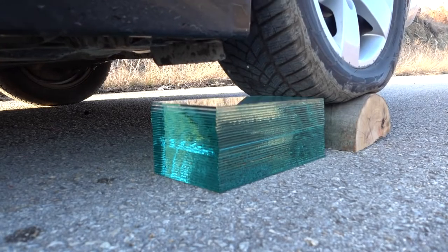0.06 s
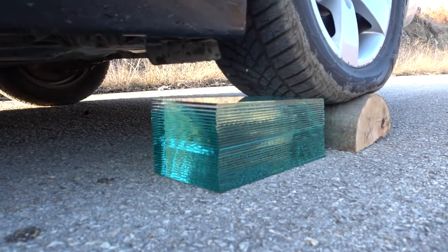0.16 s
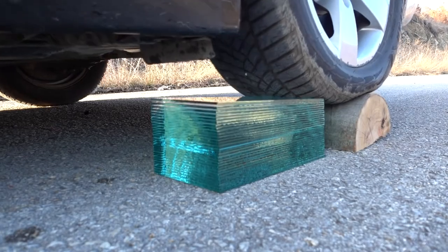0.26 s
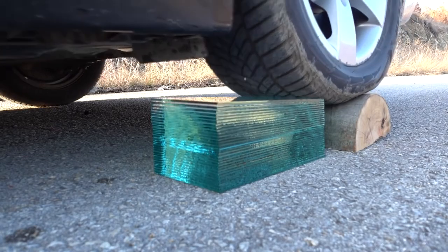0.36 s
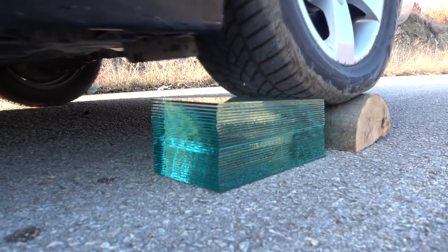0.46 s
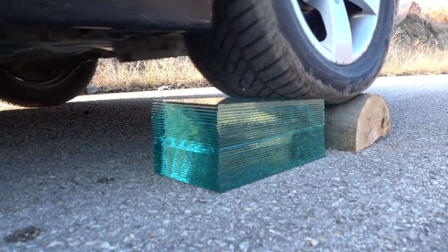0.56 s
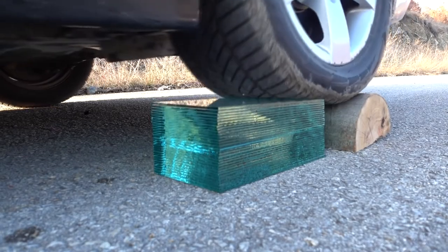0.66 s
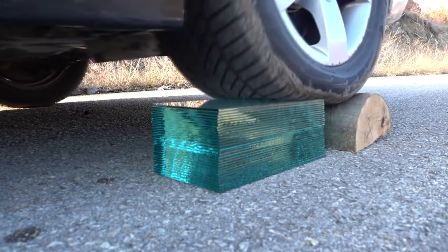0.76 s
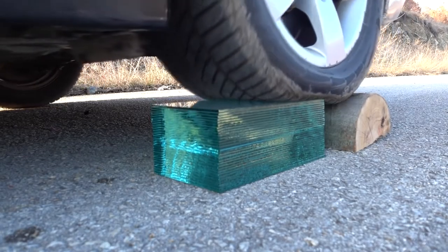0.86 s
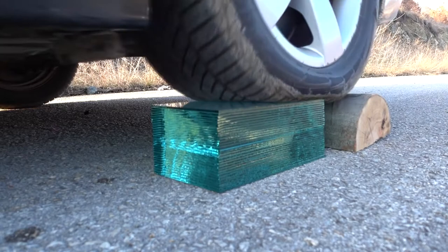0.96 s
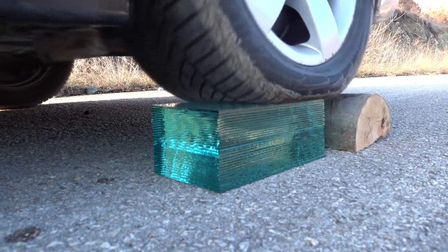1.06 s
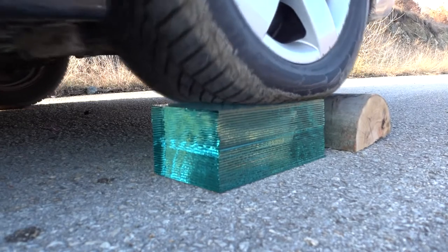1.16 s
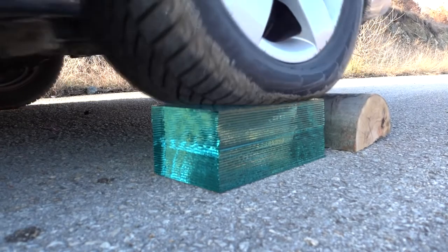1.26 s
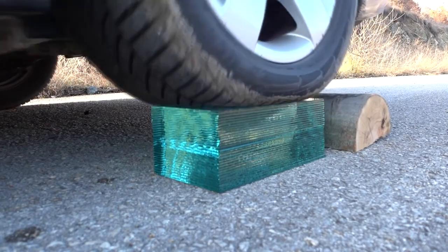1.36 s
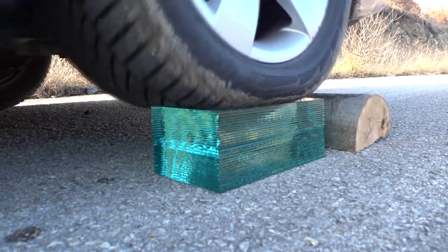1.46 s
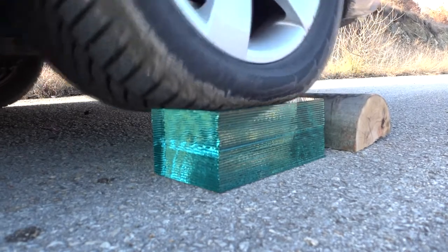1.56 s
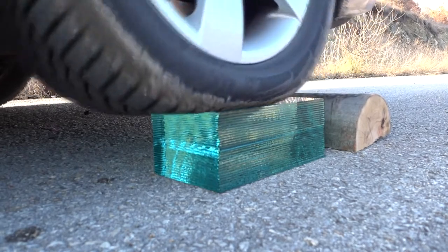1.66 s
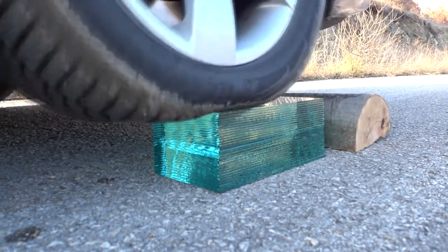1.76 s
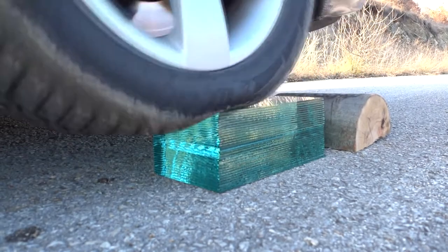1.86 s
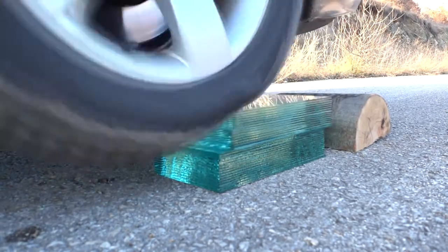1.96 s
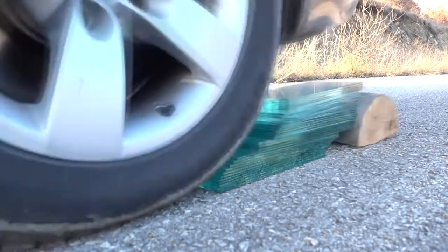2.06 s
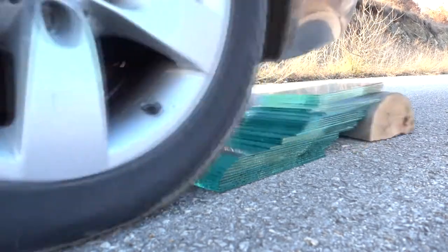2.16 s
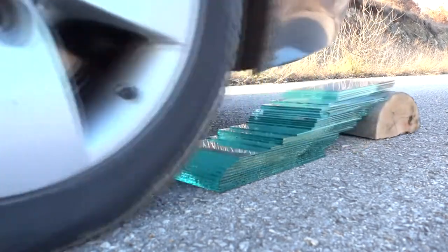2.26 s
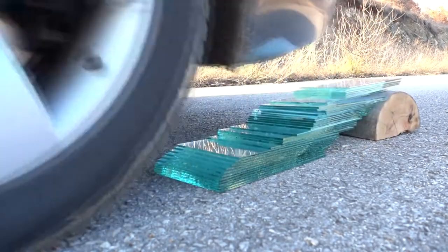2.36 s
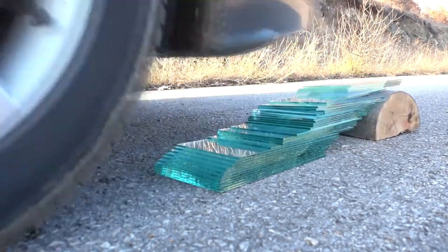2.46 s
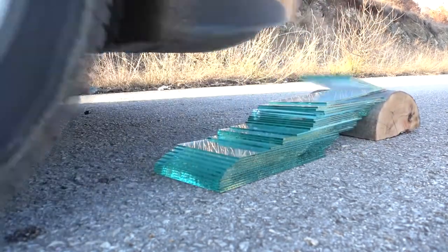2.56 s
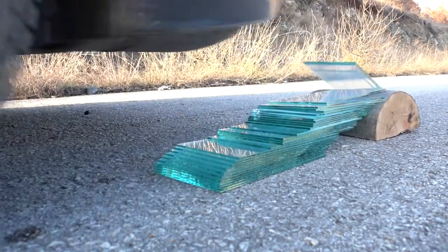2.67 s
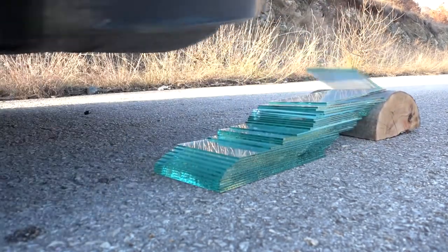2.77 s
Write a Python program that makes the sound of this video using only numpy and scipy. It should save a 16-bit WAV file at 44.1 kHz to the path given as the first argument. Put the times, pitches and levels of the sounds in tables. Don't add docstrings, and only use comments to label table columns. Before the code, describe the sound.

Close stereo pickup on a quiet open road: glass edges snap and crunch under a tyre's weight, then the wheel drops with a low thump and the panes slide, scrape, knock together and go still.

```python
import sys
import numpy as np
from scipy import signal
from scipy.io import wavfile

SR = 44100
rng = np.random.default_rng(int(sys.argv[2]) if len(sys.argv) > 2 else 0)


def linear_from_db(decibels):
    return 10 ** (np.asarray(decibels, float) / 20)


def wav_out(sig):
    wavfile.write(sys.argv[1], SR, np.round(np.clip(np.atleast_2d(sig).T, -1, 1) * 32767).astype(np.int16))


N = 125685

# pitch in Hz, level in dB per Hz.
AIR_SPECTRUM = [(25, -11), (216, 3.5), (1100, -13), (2660, -21.5), (10600, -20.5), (12000, -25)]
AIR_DB = -52.5

# time in seconds, level in dB.
THUD_LEVELS = [
    [(0, 3.5), (.018, -40), (.05, -38), (.14, -43), (.22, -71)],
    [(1.7, -55), (1.8, -50), (1.97, -51), (2.05, -30.5), (2.08, -17.5), (2.14, -21.5), (2.25, -33),
     (2.45, -35), (2.7, -43), (2.85, -43)],
]
# pitch in Hz, level in dB per Hz.
THUD_SPECTRUM = [(25, -19), (65, -0.5), (130, -8.5), (220, -6), (333, -12), (600, -31)]
TYRE_AIR_HZ, BODYWORK_HZ, TYRE_DB = 230, 132.5, 5.5

# time in seconds, brightness in dB per octave,
# level of the stack's dull body in dB, level of loose grit in dB.
LOAD = [(0, 1.5, -84, -58.5), (.45, 3, -27.5, -53), (.72, 0.5, -23.5, -31), (1.2, 0, -20, -51.5),
        (1.45, -0.5, -24.5, -45), (1.75, 3, -17.5, -44), (2.0, -0.5, -15, -41), (2.85, -1, -31, -75)]
# pitch in Hz, level in dB per Hz.
CRUMB_SPECTRUM = [(350, -14), (867, -4.5), (2610, 5.5), (4080, 5.5), (10400, -1.5), (12000, -14.5)]
GRIT_PER_S = 210

# start in seconds, peak in dB, pitch in Hz, time to ring down 60 dB in seconds.
KNOCKS = [(0.004, -30, 97, 0.062), (0.011, -24, 239, 0.1), (0.478, -28.5, 230, 0.021),
          (0.711, -29, 633, 0.055), (0.75, -26.5, 560, 0.043), (0.826, -31, 583, 0.022),
          (1.39, -25.5, 1496, 0.09), (1.7245, -20, 670, 0.046), (1.794, -16, 644, 0.035),
          (1.83, -23, 1085, 0.05), (1.982, -15, 449, 0.073), (2.059, -9, 236.3, 0.14),
          (2.097, -6, 226.4, 0.13), (2.187, -12, 224, 0.028), (2.264, -13, 795, 0.04),
          (2.342, -10.5, 763, 0.066), (2.417, -22.5, 546, 0.13), (2.514, -9, 732, 0.031),
          (2.783, -25, 630, 0.05), (2.797, -45, 875, .05)]
PLATE_RATIOS = [1, 1.68, 0.62, 1.29]

# start in seconds, peak
# in dB, crumbs after the snap in dB over that peak, pitch in Hz.
GLASS_CRACKS = [(0.0288, -55, 6, 4130), (0.1271, -42, -4, 4060), (0.186, -41, 4, 8900),
                (0.203, -27.5, 8.5, 3730), (0.2324, -16, -4, 4000), (0.2442, -24.5, 6.5, 4000),
                (0.2613, -28, 7, 4130), (0.2902, -17.5, 5.5, 4220), (0.3398, -25.5, 9, 4500),
                (0.3453, -27, 5.5, 4140), (0.3575, -40, -3, 3070), (0.413, -42.5, 10, 4270),
                (0.4559, -25, 6.5, 4400), (0.4652, -28, 2.5, 4100), (0.4998, -46, 2, 3450),
                (0.5095, -46, -3, 3590), (0.5238, -30, 13.5, 3680), (0.5366, -14.5, -2, 3580),
                (0.5798, -20.5, 8.5, 7700), (0.5963, -21.5, 5, 5940), (0.6395, -32, 11, 7800),
                (0.6656, -16, 0, 4180), (0.6996, -29.5, 13, 3030), (0.7108, -30.5, 9.5, 2650),
                (0.7269, -23, 6, 2620), (0.7489, -24, 13, 2740), (0.7926, -37.5, 16, 2270),
                (0.8248, -18.5, 4.5, 3950), (0.836, -16, 2.5, 3000), (0.8394, -27.5, -3, 2860),
               (0.8815, -16, -3.5, 2620), (0.9068, -15.5, -2, 3050), (0.9364, -15, 1, 3700),
               (0.959, -16, -5, 3400), (0.9684, -19.5, -13.5, 3100), (0.975, -31.5, 8.5, 2870),
               (1.008, -34, 7.5, 2000), (1.0603, -23.5, 5.5, 2380), (1.068, -33, 5, 2540),
               (1.0856, -34, 2, 2970), (1.1188, -15.5, -2, 3020), (1.133, -16.5, -10.5, 3130),
               (1.19, -39.5, 8, 3530), (1.2292, -35, 6, 3130), (1.2529, -20.5, 3.5, 3010),
               (1.2616, -24.5, -19, 3900), (1.283, -28, -12, 3020), (1.325, -35, 6, 3280),
               (1.3362, -29, -2, 3940), (1.3526, -20, -11.5, 3600), (1.3745, -26, -4, 2970),
               (1.3922, -14, -4.5, 2690), (1.416, -26.5, 0, 3080),
                (1.4222, -33, -7, 3000), (1.4264, -21.5, 4.5, 2830), (1.44, -27, -3, 2980),
               (1.4522, -22.5, -6, 3280), (1.4601, -19.5, 0.5, 3300), (1.479, -26.5, 5.5, 3420),
               (1.505, -25.5, 5, 3850), (1.5565, -27, 10.5, 3770), (1.5642, -27.5, 7.5, 2640),
               (1.5792, -12.5, -11, 4470), (1.587, -30, 7.5, 4040), (1.5918, -23.5, 1, 3530),
               (1.6164, -23, -5.5, 5130), (1.6422, -35.5, 3, 7070), (1.6706, -23.5, 4.5, 2450),
               (1.7258, -29.5, 18, 2910), (1.7379, -13, -8, 2730), (1.7945, -17.5, 5.5, 3060),
               (1.822, -23.5, 3.5, 2900), (1.832, -16.5, 0, 2820), (1.8612, -23.5, 11, 4500),
               (1.9106, -37, 10.5, 3550), (1.9622, -32, 8.5, 3450)]
CRACKS = GLASS_CRACKS
SNAP_CYCLES, SNAP_LATE_S, SNAP_DB = 5, .0002, 7
SHARD_T60_S, SHARD_DB = .018, -16
PANE_HZ = (2700, 4250, 7800)
PANE_DB, PANE_FADE_DB_PER_S = 9, 19
CRUMB_T60_S, CRUMB_RISE_S = .02, .0008
TAIL_T60_S, TAIL_DB = 0.12, -13
STACK_HZ, PITCH_LIFT_DB = 577, 6

# time in seconds, level in dB.
SLIDE_LEVEL = [(1.97, -57), (2.05, -32), (2.07, -26), (2.15, -23.5), (2.17, -19.5), (2.23, -20),
               (2.348, -21.5), (2.372, -36), (2.47, -49), (2.53, -33.5), (2.65, -40), (2.71, -52),
               (2.85, -55.5)]
# pitch in Hz, level in dB per Hz.
GRIND_SPECTRUM = [(250, -2), (1630, -9), (1940, 1), (4470, -2.5), (10600, -12), (12000, -22)]
GRAINS_PER_S, GRAIN_DB = 3000, 1.5

# time in seconds, level in dB.
RATTLE_LEVEL = [(1.97, -41), (2.05, -29), (2.07, -17), (2.34, -34), (2.38, -34), (2.53, -28.5),
                (2.66, -41.5), (2.76, -43), (2.79, -25), (2.85, -53)]

# start in seconds, peak in dB, pitch in Hz, length in seconds.
SCUFFS = [(2.001, -28, 2010, 0.01), (2.018, -17.5, 1840, .01), (2.062, -22, 2440, 0.014),
          (2.109, -6, 2200, 0.01), (2.135, -9.5, 2710, 0.014), (2.163, -16.5, 2990, 0.0073),
          (2.207, -8, 2010, 0.022), (2.227, -20, 2190, 0.0071), (2.248, -25, 2540, 0.025),
          (2.271, -19, 2020, 0.013), (2.3185, -23, 2400, 0.0035), (2.331, -11, 3000, 0.0091),
          (2.484, -27, 2350, .015), (2.533, -19.5, 2100, 0.012), (2.566, -27, 2530, 0.016),
          (2.579, -18.5, 3660, 0.013), (2.594, -16, 5700, 0.0055), (2.622, -25, 2020, 0.024),
          (2.634, -17, 4450, 0.0084), (2.682, -17.5, 6630, 0.015), (2.785, -42, 1580, 0.011)]
SCUFF_WIDE = 0.66

# pitch in Hz, likeness from 0 to 1.
LIKENESS = [(60, 1), (500, 0.76), (2000, 0.78), (5000, 0.61), (11000, 0.25)]
# time in seconds, left over right in dB.
PAN = [(0, -1), (1.2, 0.5), (2.3, 0.4), (2.6, 1)]


def rms_one(x):
    return x / np.sqrt(np.mean(x ** 2) + 1e-20)


def in_time(rows):
    s, *columns = np.transpose(rows)
    return [np.interp(np.arange(N) / SR, s, c) for c in columns]


def gate(rows):
    before, after = (rows[0][0] - .01, -120), (rows[-1][0] + .1, -120)
    return linear_from_db(in_time([before] + list(rows) + [after])[0])


def at_hz(points, hz):
    table = np.array(points)
    return np.interp(np.log(hz), np.log(table[:, 0]), table[:, 1])


def drift(rate):
    r = np.exp(-80 * np.pi * rate / SR)
    slow = signal.lfilter([1], [1, -2 * r, r * r], rng.standard_normal(N // 40 + 2002))[2000:]
    return np.interp(np.arange(N) / 40, np.arange(len(slow)), rms_one(slow))


def ring(clicks, hz, t60):
    r, w = linear_from_db(-60 / (t60 * SR)), 2 * np.pi * hz / SR
    return signal.lfilter([0, np.sin(w)], [1, -2 * r * np.cos(w), r * r], clicks + 1e-18)


def fade(clicks, t60):
    return signal.lfilter([1], [1, -linear_from_db(-60 / (t60 * SR))], clicks + 1e-18)


def colour(white, spectrum, tilt_db=0, patchy_db=0, peak_hz=1):
    out, low = 0, spectrum[0][0]
    edges = low * 2 ** np.arange(0, np.log2(spectrum[-1][0] / low) + .3, 1 / 3)
    for k, (low, high) in enumerate(zip(edges, edges[1:])):
        band = signal.butter(2, [low, high], "band", fs=SR, output="sos")
        mid, side = signal.sosfilt(band, white)
        hz = np.sqrt(low * high)
        alike = np.clip(at_hz(LIKENESS, hz), 0, 1)
        lift_db = PITCH_LIFT_DB * np.exp(-(np.log2(hz / peak_hz) / .3) ** 2)
        level_db = at_hz(spectrum, hz) + tilt_db * np.log2(hz / 3000) + lift_db
        gain = linear_from_db(level_db + patchy_db * drift(14))
        stereo = np.sqrt(1 + alike) * mid + np.sqrt(1 - alike) * side * [[1], [-1]]
        out = out + (-1) ** k * gain * stereo
    return rms_one(out)


def hiss():
    return rng.standard_normal((2, N))


def grains(per_s, spread_db):
    sizes = linear_from_db(spread_db * np.minimum(rng.exponential(1, (2, N)), 3.5))
    sizes = sizes * rng.choice([-1, 1], (2, N))
    return rms_one(sizes * (rng.random(N) < per_s / SR))


def open_air():
    return linear_from_db(AIR_DB) * linear_from_db(0.5 * drift(0.9)) * colour(hiss(), AIR_SPECTRUM)


def thuds():
    bump, drop = THUD_LEVELS
    lumps = colour(hiss(), THUD_SPECTRUM, patchy_db=-2.0)
    hum = sum(rms_one(ring(rng.standard_normal(N), hz, .13)) for hz in (TYRE_AIR_HZ, BODYWORK_HZ))
    dropped = lumps + linear_from_db(TYRE_DB) * hum * [[1.1], [.9]]
    return 0.45 * (gate(bump) * lumps + gate(drop) * dropped)


def loose_grit():
    _, _, grit_db = in_time(LOAD)
    chips = grains(GRIT_PER_S * linear_from_db(4 * drift(12)), 2.5) + .6 * hiss()
    return linear_from_db(grit_db) * colour(chips, CRUMB_SPECTRUM, -1, 2.5)


def knocks():
    size = 9000
    out = np.zeros(N + size)
    for s, db, hz, t60 in KNOCKS:
        blow = np.zeros(size)
        blow[:300] = np.hanning(300) * rng.standard_normal(300)
        push = int(1.3 * SR / hz)
        blow[:push] += 2.5 * np.hanning(push) * np.sin(2 * np.pi * hz * np.arange(push) / SR)
        note = 0
        for k, ratio in enumerate(PLATE_RATIOS):
            note = note + linear_from_db(-2.2 * k) * ring(blow, hz * ratio, np.clip(t60, .01, .2) / ratio)
        i = int(s * SR)
        out[i:i + size] += linear_from_db(db) * note / np.abs(note).max()
    return out[:N]


def snap_and_shards(s, db, hz, luck):
    click = np.zeros(4000)
    click[int(SNAP_LATE_S * SR)] = linear_from_db(db)
    snap = ring(ring(click, hz, SNAP_CYCLES / hz), hz, SNAP_CYCLES / hz)
    snap *= linear_from_db(db + SNAP_DB) / np.abs(snap).max()
    shards = sum(ring(click, min(hz * 2 ** (2 * u - .8), 10500), SHARD_T60_S) for u in luck[:8])
    pane = sum((1 + u) * ring(click, f, 260 / f) for f, u in zip(PANE_HZ, luck))
    shards += linear_from_db(PANE_DB - PANE_FADE_DB_PER_S * s) * pane
    return snap + linear_from_db(SHARD_DB) * shards


def crumbs(rush):
    tilt, _, _ = in_time(LOAD)
    starts, pitches = np.transpose(CRACKS)[[0, 3]]
    latest = np.maximum(np.searchsorted(starts, np.arange(N) / SR) - 1, 0)
    source = hiss() + .5 * grains(2000, 4)
    noise = colour(source, CRUMB_SPECTRUM, tilt, 3, pitches[latest])
    env = fade(rush, CRUMB_T60_S) + linear_from_db(TAIL_DB) * fade(rush, TAIL_T60_S) - fade(rush, CRUMB_RISE_S)
    return env * linear_from_db(1.15 * drift(90)) * noise


def stack_thock(rush):
    _, body_db, _ = in_time(LOAD)
    body = sum(ring(np.gradient(rng.standard_normal(N)), STACK_HZ * k, .015) for k in (.75, 1, 1.3))
    return linear_from_db(body_db) * fade(rush, 0.11) * rms_one(body)


def cracks():
    out, rush = np.zeros(N + 4000), np.zeros(N)
    for (s, db, crumb_db, hz), luck in zip(CRACKS, rng.random((len(CRACKS), 9))):
        i = int(s * SR)
        out[i:i + 4000] += snap_and_shards(s, db, hz, luck)
        rush[i] += linear_from_db(db + crumb_db)
    sharp = signal.sosfilt(signal.butter(2, 1500, "high", fs=SR, output="sos"), out[:N])
    return sharp + stack_thock(rush) + crumbs(rush)


def slide():
    source = hiss() + linear_from_db(GRAIN_DB) * grains(GRAINS_PER_S, 5.3)
    grind = linear_from_db(2 * drift(70)) * colour(source, GRIND_SPECTRUM, patchy_db=1.5)
    clink = sum(ring(grains(45, 4), hz, 30 / hz) for hz in np.geomspace(900, 5000, 14))
    return gate(SLIDE_LEVEL) * (grind + .65 * rms_one(clink[0] + .5 * clink))


def rattle():
    source = grains(700, 3.5) + 0.58 * hiss()
    chatter = colour(source, [(300, -11.5), (600, 0.5), (2500, -18.5)], patchy_db=-4.5)
    return gate(RATTLE_LEVEL) * chatter


def scuffs():
    size = 3000
    out = np.zeros((2, N + size))
    for s, db, hz, long_s in SCUFFS:
        noise = rng.standard_normal((2, size))
        rub = np.diff(noise[0] + .5 * noise[1] * [[-1], [1]], prepend=0)
        rub = signal.lfilter([1], [1, -.8], rub)
        t = np.arange(size) / (.3 * long_s * SR)
        burst = t * np.exp(-t) * (rms_one(ring(rub, hz, 9 / hz)) + SCUFF_WIDE * rms_one(rub))
        i = int(s * SR)
        out[:, i:i + size] += linear_from_db(db) * burst / np.abs(burst).max()
    return out[:, :N]


def scene():
    pan_db, = in_time(PAN)
    air, low = open_air(), thuds()
    glass = loose_grit() + knocks() + cracks() + slide() + rattle() + scuffs()
    return glass * linear_from_db(pan_db * [[.5], [-.5]]) + low + air


def low_pass(x):
    return signal.sosfilt(signal.butter(12, 12390, fs=SR, output="sos"), x)


def record(dry):
    rounded = .78 * np.tanh(dry / .78)
    top_cut = signal.cheby1(12, .5, 11100, fs=SR, output="sos")
    return low_pass(signal.sosfilt(top_cut, rounded))


dry = scene()
out = record(dry)
wav_out(out)
```